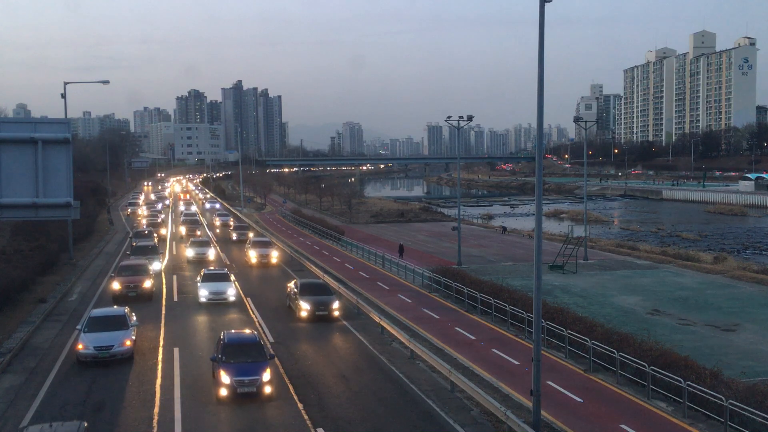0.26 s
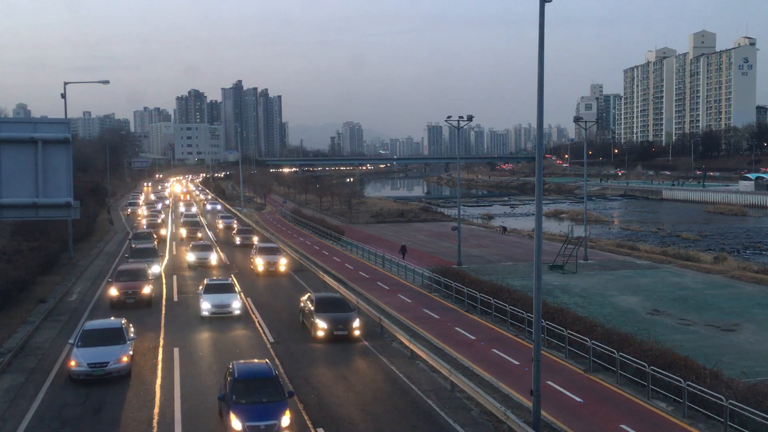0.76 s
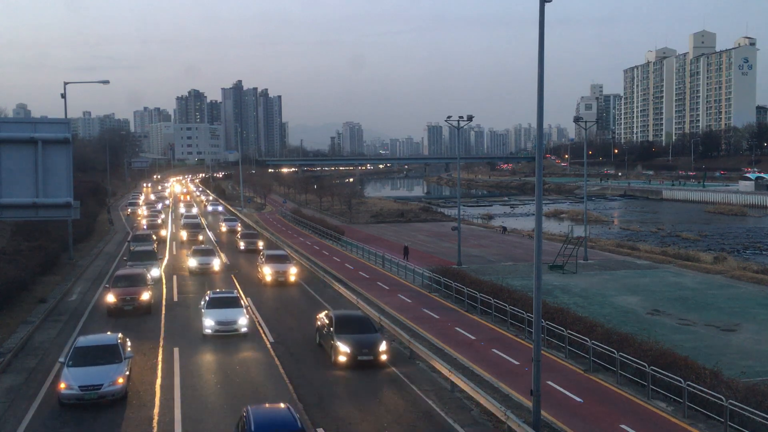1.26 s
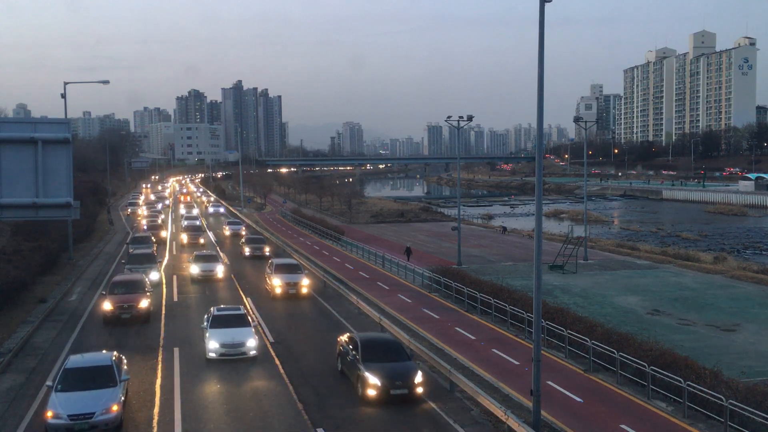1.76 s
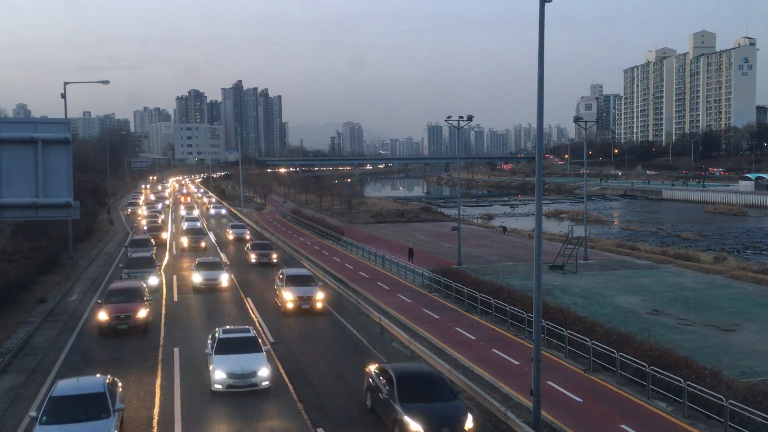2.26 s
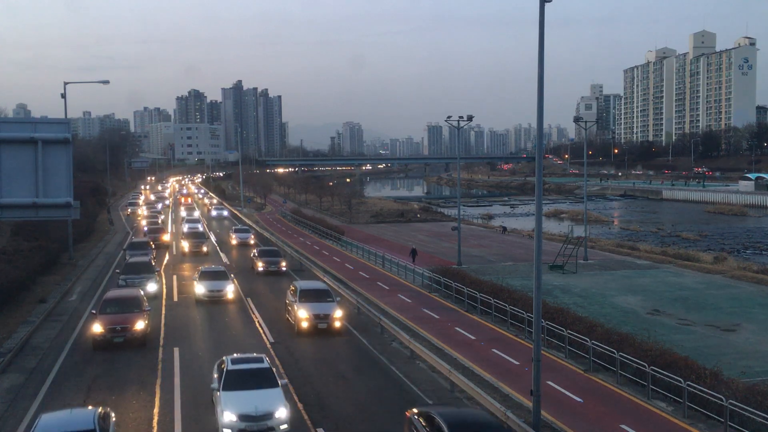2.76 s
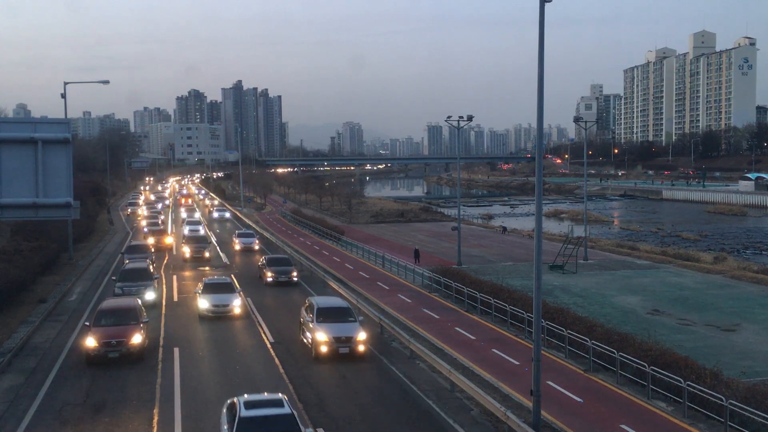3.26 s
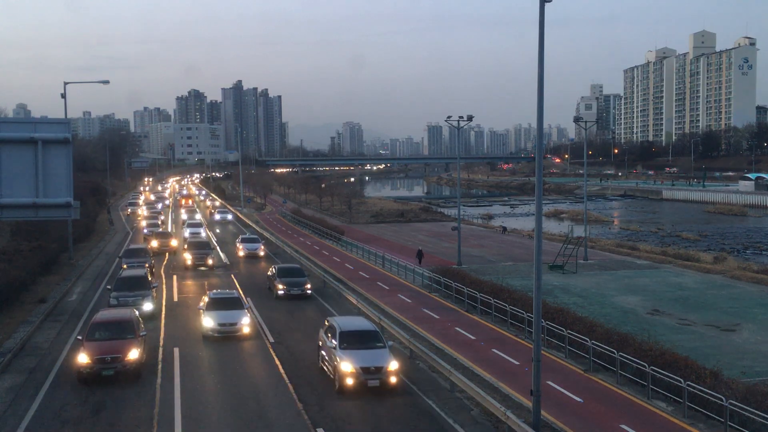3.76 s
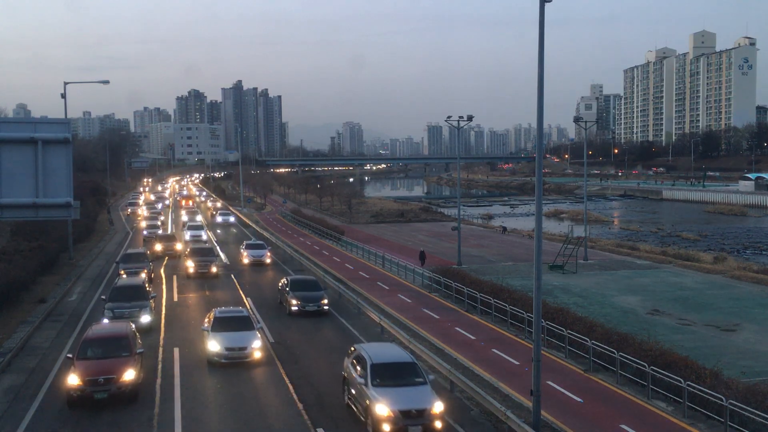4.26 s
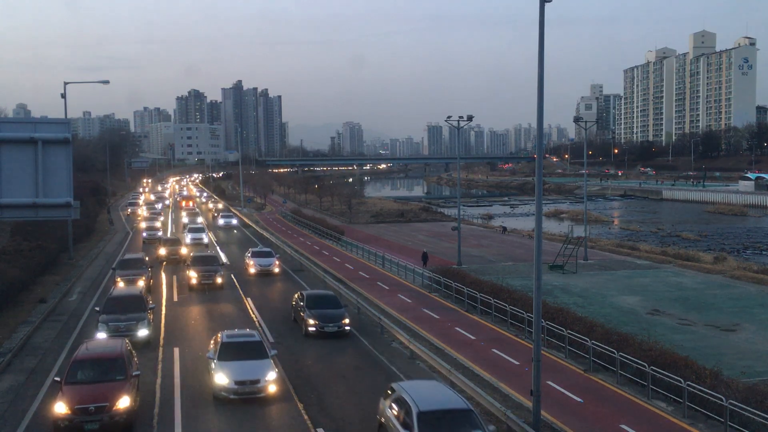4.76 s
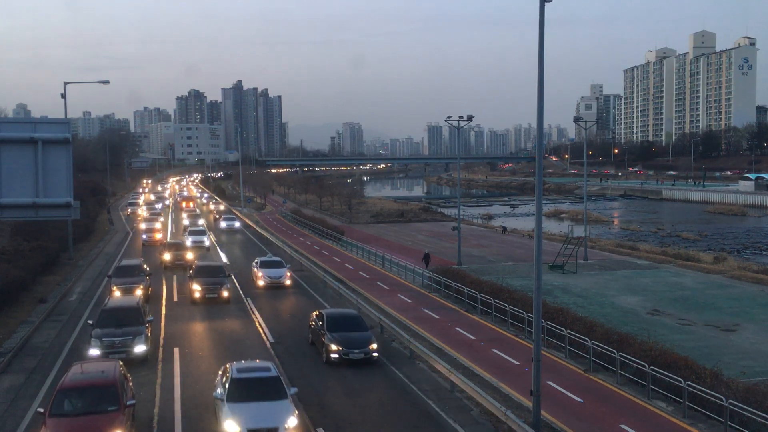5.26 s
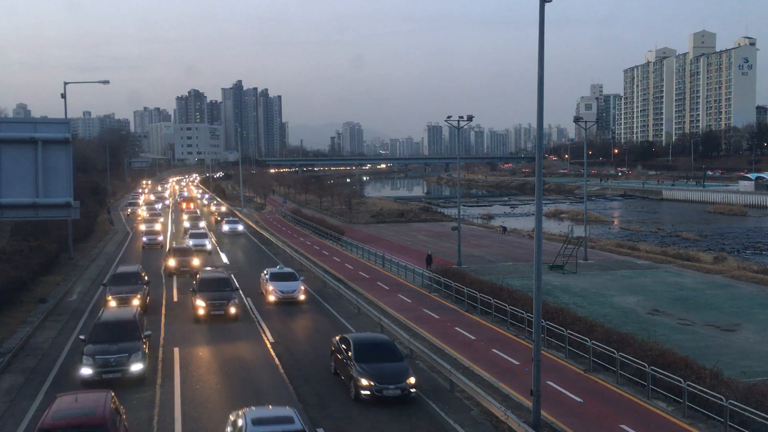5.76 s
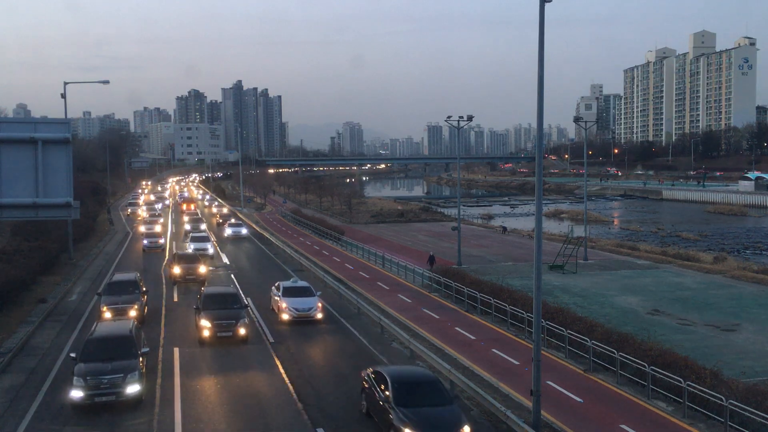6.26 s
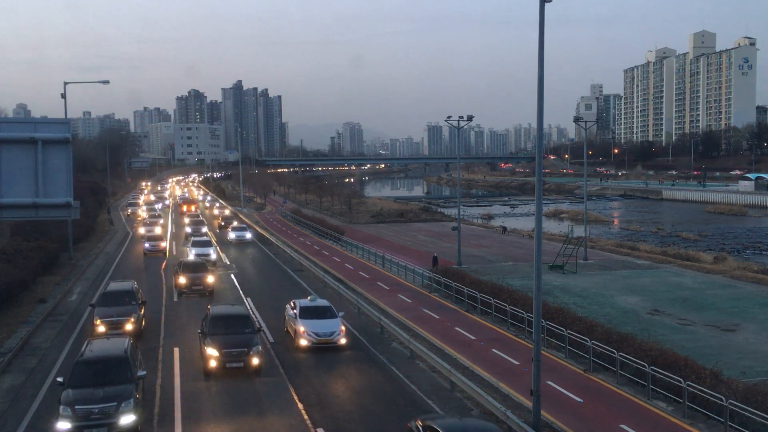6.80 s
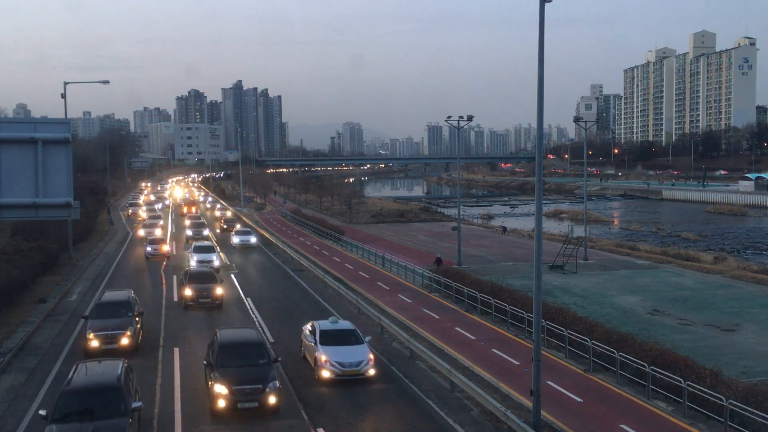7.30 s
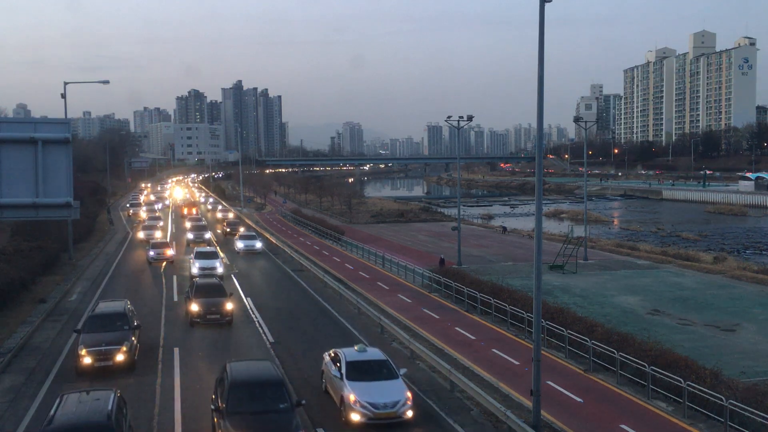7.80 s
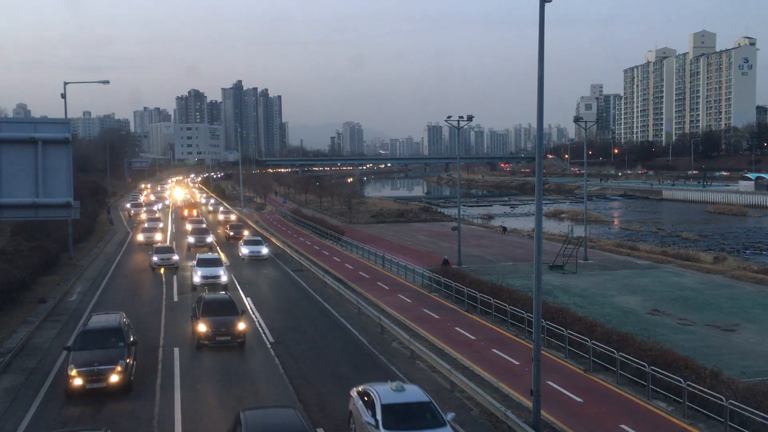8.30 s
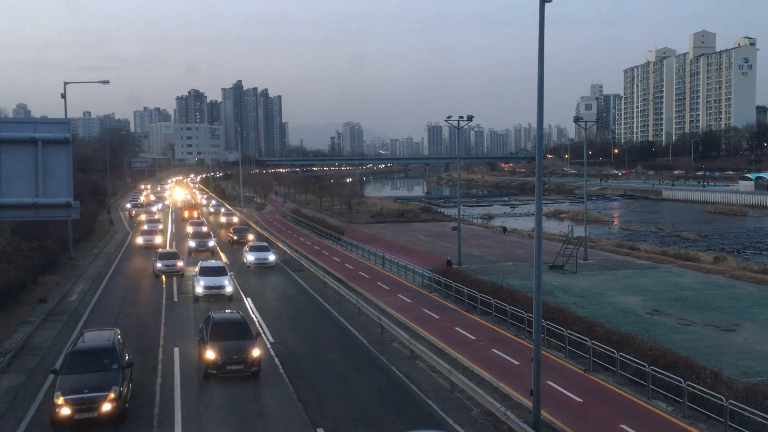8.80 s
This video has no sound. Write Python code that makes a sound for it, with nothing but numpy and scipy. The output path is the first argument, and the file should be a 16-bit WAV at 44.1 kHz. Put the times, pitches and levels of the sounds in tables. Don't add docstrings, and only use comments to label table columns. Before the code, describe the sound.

Dense, slow traffic on a multi-lane expressway heard from above: constant low engine rumble and broad tyre roar, with faint hisses swelling as cars pass beneath.

```python
import sys
import numpy as np
from scipy import signal
from scipy.io import wavfile
from scipy.ndimage import uniform_filter1d

SR = 44100
rng = np.random.default_rng(int(sys.argv[2]) if len(sys.argv) > 2 else 0)


def voltage_ratio(decibels):
    exponent = np.asarray(decibels, float) / 20
    return 10 ** exponent


def to_wav(sig):
    pcm = np.clip(np.atleast_2d(sig), -1, 1) * 32767
    pcm = np.round(pcm).astype(np.int16)
    wavfile.write(sys.argv[1], SR, pcm.T)


N = 398663

# (time [s], firing pitch [Hz], peak level [dB])
IDLING_PULLS = [(0.1, 45.7, -34), (1.0, 45.8, -43), (1.8, 48.67, -33.5), (2.6, 45, -38), (3.6, 50.8, -43),
                (4.4, 50.87, -35), (4.8, 50.73, -34), (5.2, 49.5, -33), (6.2, 45.9, -34), (6.7, 45.04, -35),
                (7.45, 49, -44), (8.5, 42.05, -34), (8.95, 39.43, -40)]
ROLLING_PULLS = [(0.0, 59.1, -33), (0.55, 59.87, -35.5), (1.1, 57.1, -32.5), (1.7, 60.8, -34.5),
                 (2.4, 53.5, -41), (2.8, 56.7, -38), (3.4, 58.3, -34.5), (4.0, 59.15, -32.5),
                 (4.47, 61.5, -29), (5.0, 57.5, -33.5), (5.3, 60.5, -31.5), (5.55, 61.5, -30.5),
                 (6.4, 55, -37), (6.9, 55.8, -42), (7.4, 62.5, -36), (7.8, 63.4, -40), (8.45, 53.8, -35),
                 (8.8, 56.3, -32)]
PULLING_PULLS = [(0.1, 88, -46), (1.0, 84.5, -40), (1.8, 85, -43), (2.35, 84.5, -41), (3.0, 85.8, -39),
                 (3.9, 85.6, -42), (5.2, 86, -42), (5.85, 81, -36), (6.4, 83, -43), (7.3, 85, -38),
                 (7.7, 88, -43), (8.4, 85.2, -39)]
REVVING_PULLS = [(0.3, 101, -38.5), (1.0, 100.4, -45), (1.5, 103, -40.5), (2.1, 102.5, -40),
                 (2.8, 93.86, -41.5), (4.05, 98.1, -39), (4.4, 104, -38), (4.8, 104.2, -36.5),
                 (5.2, 98.5, -37.5), (5.8, 100.2, -40), (6.2, 101.6, -39), (6.65, 101.2, -35),
                 (6.95, 100.5, -37.5), (7.3, 103.3, -36.5), (7.8, 103.5, -38), (8.55, 101.3, -48),
                 (8.95, 97.5, -43)]
# (time [s], pitch [Hz], peak level [dB])
HIGHER_PULLS = [(0.75, 138.4, -40), (1.8, 131.5, -49), (2.4, 132.4, -43.5), (3.5, 133, -47),
                (4.5, 139.3, -42), (5.1, 138.8, -47), (5.9, 134.2, -41.5), (6.9, 133.6, -44),
                (7.5, 135, -42.5), (8.2, 139.5, -52), (9.0, 136.5, -47)]
COAST_DB, COAST_FLUTTER_DB = -49, 3.5

# (start [s], end [s], start pitch [Hz], end pitch [Hz], level [dB])
SURGES = [
    (8.48, 9.5, 66, 66.3, -35),
    (6.5, 7.07, 95, 94, -30.5),
    (4.9, 5.6, 118, 122, -40),
    (7.9, 9.0, 94, 91, -39),
    (3.636, 4.4, 105, 94, -41),
    (6.0, 6.45, 237, 237, -47),
    (7.45, 7.9, 46, 36, -33),
    (6.89, 7.46, 470, 370, -52.5),
]

# (time [s], roar level [dB])
TRAFFIC = [
    (0.0, -44),
    (0.6, -42.5),
    (1.9, -43),
    (2.7, -41.5),
    (4.4, -41),
    (5.0, -42),
    (5.8, -40.5),
    (7.2, -40.5),
    (7.6, -41),
    (9.04, -41.5),
]

# (frequency [Hz], density [dB per Hz])
RUMBLE_SPECTRUM = [(20, -50), (30, -37), (38, -9.5), (48, -7.5), (62, -8), (74, -9.5), (90, -12.5),
                   (105, -7.5), (116, -14.5), (180, -14.5), (215, -18), (260, -21.5), (330, -25),
                   (500, -35.5)]
# (frequency [Hz], width [Hz], gain [dB])
BOOMS = [
    (232.7, 15.2, 6),
    (287.6, 20, 7.5),
]
RUMBLE_DB, RUMBLE_FOLLOWS = -37.5, 0.68

# (frequency [Hz], density [dB per Hz])
ROAR_SPECTRUM = [(200, -26), (300, -6), (360, -4.5), (500, -6), (700, -4), (850, -2.5), (960, -2),
                 (1120, -4.5), (1460, -9.5), (1800, -14), (2550, -17), (3200, -24), (3800, -34.5),
                 (5200, -37)]
TREAD_FOLLOWS = 0.55

# (frequency [Hz], density [dB per Hz])
HISS_SPECTRUM = [(2000, -29), (3200, -6), (3800, -5.5), (5250, -8), (7000, -8), (7500, -13.5), (7900, -13),
                 (8600, -8.5), (10050, -12.5), (10420, -15.5), (10800, -13), (12500, -12), (15050, -13.5)]
TOP_STEP_HZ, TOP_STEP_DB = 15200, -1.5
# (time of slipping under the deck [s], closest hiss level [dB], brightness above 8 kHz [dB])
CARS = [(0.05, -72, -2), (0.5, -64.5, 1), (1.05, -67, 1), (1.75, -67, 0), (2.4, -61, 0.3), (3.3, -67, -6),
        (3.9, -63, -6), (4.5, -60, -0.3), (5.05, -59.5, 0.3), (5.45, -60, -4), (5.86, -58.5, 3),
        (6.2, -64, -1), (7.0, -63, -3), (7.45, -58.5, 0), (8.0, -71, -8), (8.45, -64.5, -5),
        (8.75, -64.5, -2), (9.2, -59.5, 0.5)]
CAR_SPEED_M_S, DECK_HEIGHT_M, SHADOW_S = 14.5, 6.5, 0.16
FAR_HISS_DB, FAR_BRIGHT_DB = -65, 0.2

# (start [s], end [s], centre [Hz], width [Hz], level [dB])
WHINES = [(-1.5, 4.5, 955, 120, -48), (3.0, 8.0, 965, 130, -47.5), (1.6, 2.55, 2630, 140, -57.5),
          (1.75, 2.6, 8450, 450, -71.5), (3.5, 5.6, 5000, 350, -70), (3.6, 4.6, 8500, 700, -70.5),
          (3.9, 4.5, 2725, 150, -64), (4.8, 5.4, 2800, 200, -62), (4.8, 5.9, 12200, 1400, -68.5),
          (4.8, 5.9, 9000, 1200, -69), (6.8, 7.4, 5780, 500, -67), (6.8, 7.3, 8200, 400, -74),
          (6.8, 7.3, 15000, 600, -77), (7.9, 8.58, 6800, 520, -62.5), (8.6, 9.2, 14800, 1200, -72),
          (3.6, 4.3, 12500, 900, -73)]
WHINE_SAG = 0.015


def evened(x):
    return x / np.sqrt(np.mean(x ** 2) + 1e-20)


def read_spectrum(points, hz):
    f, value = np.transpose(points)
    return np.interp(np.log(hz + 1), np.log(f + 1), value, left=-90)


def follow(rows, t):
    s, *columns = np.transpose(rows)
    return [np.interp(t, s, column) for column in columns]


def frame_grid(size):
    return np.arange(4 * N // size + 6) * size / 4 / SR, np.fft.rfftfreq(size, 1 / SR)[:, None]


def unit_power(db):
    return voltage_ratio(db) ** 2 / np.sum(voltage_ratio(db) ** 2, axis=0)


def noise(power, patchy_db, patch_hz, patch_s):
    size = 2 * (len(power) - 1)
    a, b, patches = rng.standard_normal((power.shape[1], len(power), 3)).T
    patches = uniform_filter1d(patches, max(1, round(patch_hz * size / SR)), axis=0)
    patches = evened(uniform_filter1d(patches, max(1, round(patch_s * 4 * SR / size)), axis=1))
    z = (a + 1j * b) * np.sqrt(power) * voltage_ratio(patchy_db * patches)
    return signal.istft(z * np.sqrt(2 / 3), nperseg=size, noverlap=3 * size // 4)[1][:N]


def engine(rows, wander_hz, pull_s):
    t, knots = np.arange(N) / SR, np.arange(0, N / SR + 1, 1 / 12)
    hz = follow(rows, t)[0]
    random_knots = rng.standard_normal((len(knots), 2)).T
    wander, flutter = (np.interp(t, knots, r) for r in random_knots)
    pulls = sum(voltage_ratio(db) ** 2 * np.exp(-((knots - s) / pull_s) ** 2) for s, _, db in rows)
    coast = voltage_ratio(COAST_DB + COAST_FLUTTER_DB * flutter)
    level = np.sqrt(np.interp(t, knots, pulls) + coast ** 2)
    phase = 2 * np.pi * np.cumsum(hz + wander_hz * wander) / SR
    return np.sqrt(2) * level * np.sin(phase)


def rumble():
    t, hz = frame_grid(size=8192)
    booms_db = sum(db / (1 + (2 * (hz - f) / width) ** 2) for f, width, db in BOOMS)
    shape_db = read_spectrum(RUMBLE_SPECTRUM, hz) - 90 * (hz > 600) + booms_db
    traffic_db, = follow(TRAFFIC, t)
    level_db = RUMBLE_DB + RUMBLE_FOLLOWS * (traffic_db - traffic_db.mean())
    power = unit_power(shape_db) * voltage_ratio(level_db + 6.0) ** 2
    return noise(power, patchy_db=1.3, patch_hz=16, patch_s=0.35)


def nearness(t):
    s, db, _ = np.transpose(CARS)[:, :, None]
    ahead_m = CAR_SPEED_M_S * (s - t)
    spreading = 1 / (1 + (ahead_m / DECK_HEIGHT_M) ** 2)
    shadow = (1 + np.tanh((s - t) / SHADOW_S)) / 2
    return voltage_ratio(db) ** 2 * spreading * shadow


def roar_power(t, hz, near_db):
    roar_db, = follow(TRAFFIC, t)
    tread_share = 1 / (1 + (1650 / (hz + 1)) ** 6)
    swing_db = near_db - near_db.mean() - roar_db + roar_db.mean()
    level_db = roar_db + 5.0 + tread_share * TREAD_FOLLOWS * swing_db
    return unit_power(read_spectrum(ROAR_SPECTRUM, hz) - 90 * (hz > 6000)) * voltage_ratio(level_db) ** 2


def hiss_power(t, hz, cars, near_db):
    far_bright = FAR_BRIGHT_DB * voltage_ratio(FAR_HISS_DB) ** 2
    bright_db = (np.transpose(CARS)[2] @ cars + far_bright) / voltage_ratio(near_db) ** 2
    top_share = 1 / (1 + (7700 / (hz + 1)) ** 8)
    gusts = uniform_filter1d(rng.standard_normal(len(t)), size=14)
    gusts = evened(uniform_filter1d(gusts, size=14))
    level_db = near_db + 0.2 * gusts + 5.0 + top_share * bright_db
    shape_db = read_spectrum(HISS_SPECTRUM, hz) + TOP_STEP_DB * (hz > TOP_STEP_HZ)
    return unit_power(shape_db) * voltage_ratio(level_db) ** 2


def whine_power(t, hz):
    power = np.zeros((len(hz), len(t)))
    for start, end, whine_hz, width_hz, db in WHINES:
        u = np.clip((t - start) / (end - start), 0, 1)
        on = (u > 0) & (u < 1)
        centre_hz = whine_hz * (1 + WHINE_SAG * (1 - 2 * u[on]))
        band = (1 + (2 * (hz - centre_hz) / width_hz) ** 2) ** -2.0
        band /= band.sum(axis=0)
        power[:, on] += band * voltage_ratio(db) ** 2 * np.sin(np.pi * u[on]) ** 0.78
    return power


def tyres():
    t, hz = frame_grid(size=1024)
    cars = nearness(t)
    near_db = 10 * np.log10(cars.sum(axis=0) + voltage_ratio(FAR_HISS_DB) ** 2)
    power = roar_power(t, hz, near_db) + hiss_power(t, hz, cars, near_db) + whine_power(t, hz)
    return noise(power, patchy_db=0.98, patch_hz=278.4, patch_s=0.24)


def surge(start, end, start_hz, end_hz, db):
    u = np.linspace(0, 1, round((end - start) * SR))
    hz = start_hz + u * (end_hz - start_hz)
    swell = np.sqrt(2) * voltage_ratio(db) * np.sin(np.pi * u)
    tone = swell * np.sin(2 * np.pi * np.cumsum(hz) / SR)
    return np.pad(tone, (round(start * SR), N))[:N]


def scene():
    engines = engine(IDLING_PULLS, wander_hz=0.76, pull_s=0.13)
    engines += engine(ROLLING_PULLS, wander_hz=0.782, pull_s=0.13)
    engines += engine(PULLING_PULLS, wander_hz=1.8, pull_s=0.19)
    engines += engine(REVVING_PULLS, wander_hz=1.058, pull_s=0.13)
    engines += engine(HIGHER_PULLS, wander_hz=2.22, pull_s=0.17)
    surges = sum(surge(*row) for row in SURGES)
    return (engines + surges + rumble() + tyres())[None]


def roll_off(x):
    return signal.sosfilt(signal.butter(12, 15700, fs=SR, output="sos"), x)


def record(dry):
    return roll_off(dry)


dry = scene()
out = record(dry)
to_wav(out)
```